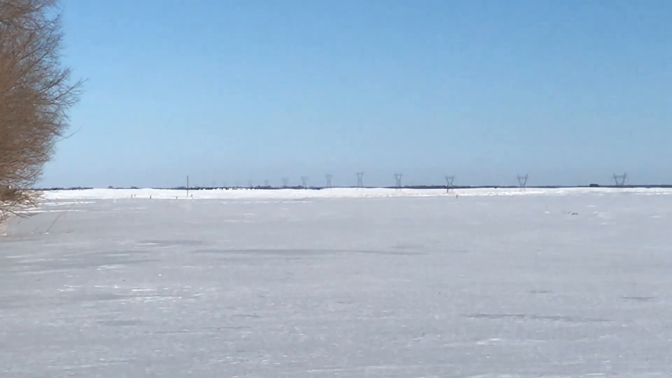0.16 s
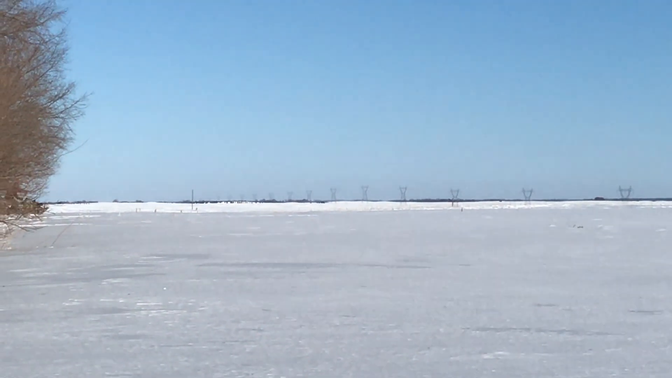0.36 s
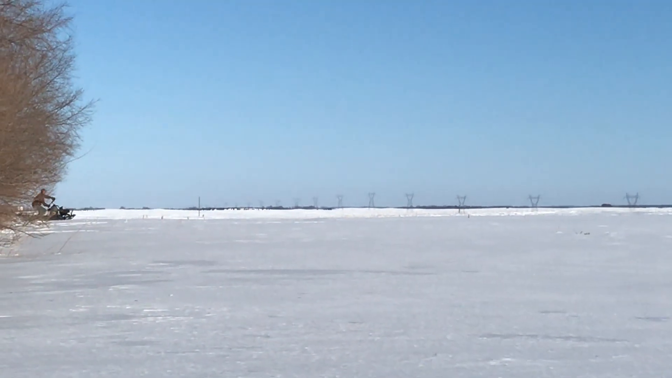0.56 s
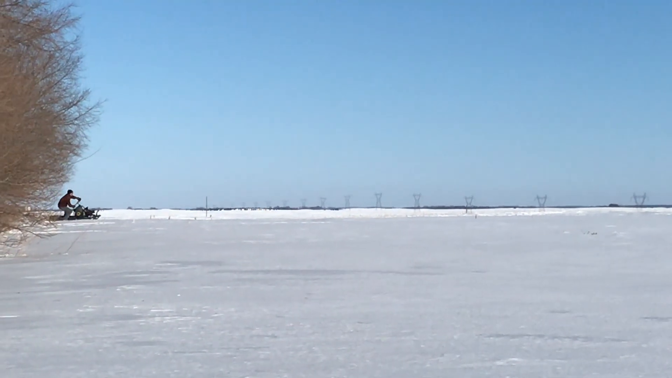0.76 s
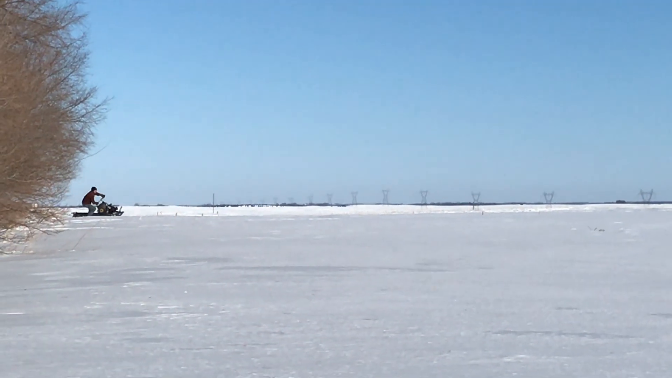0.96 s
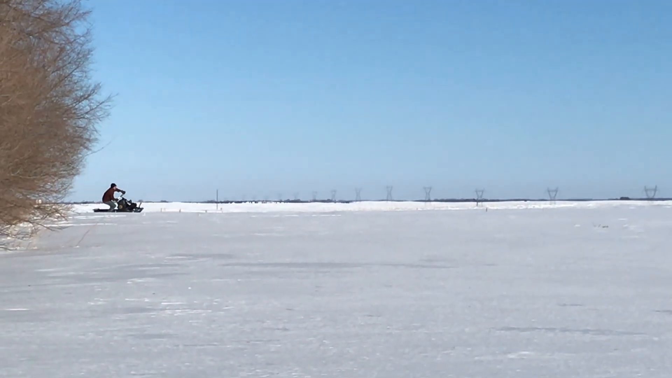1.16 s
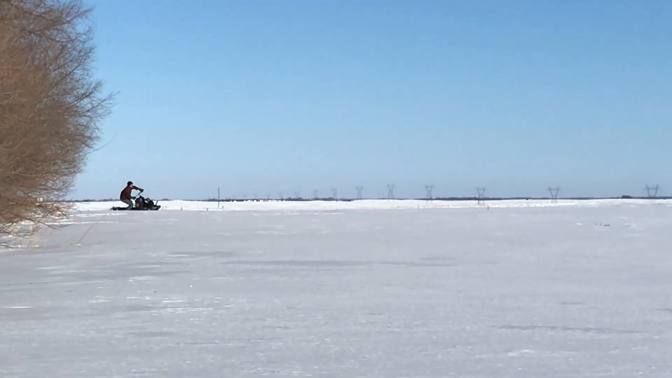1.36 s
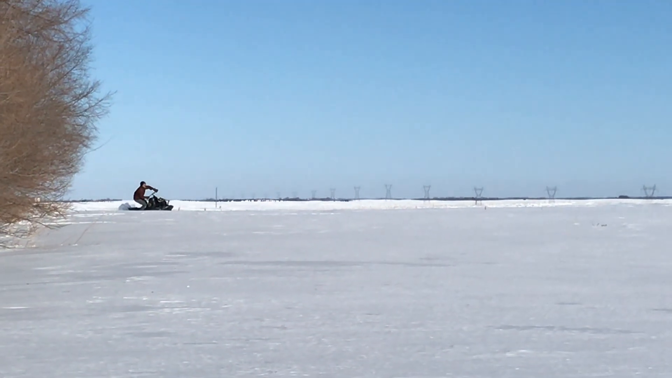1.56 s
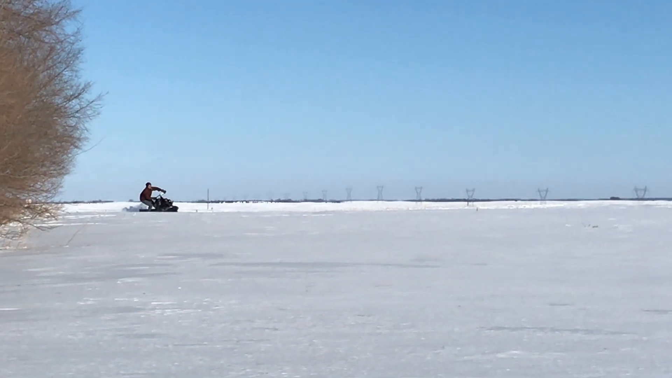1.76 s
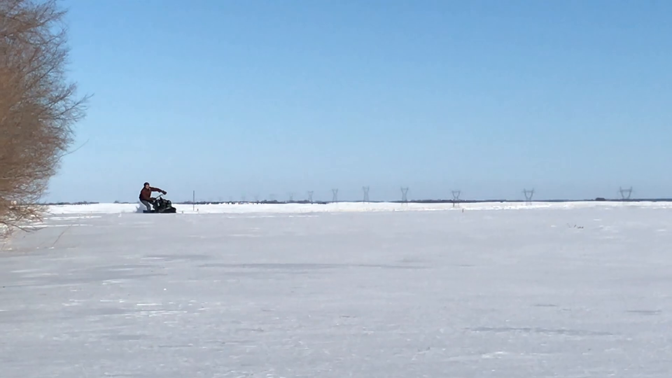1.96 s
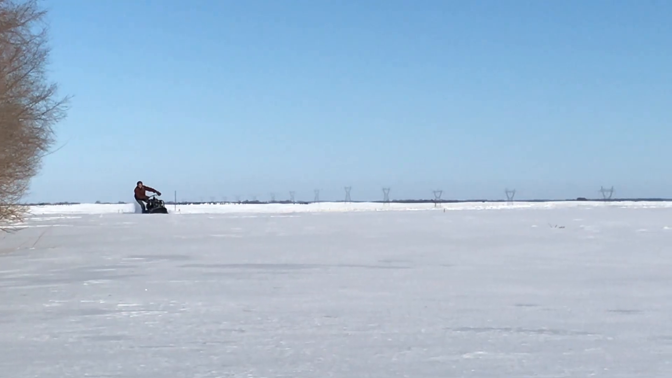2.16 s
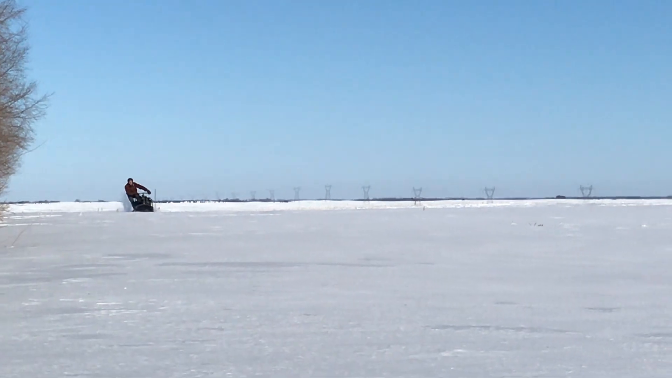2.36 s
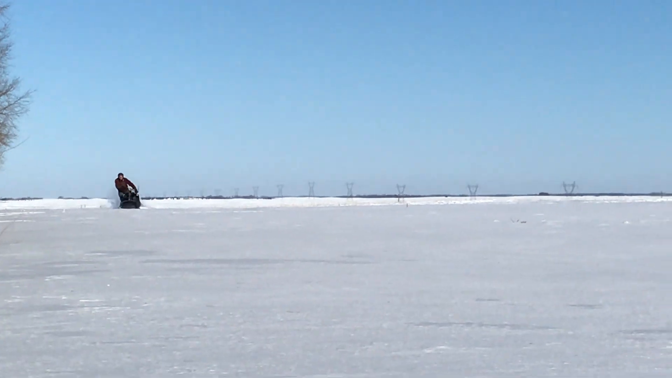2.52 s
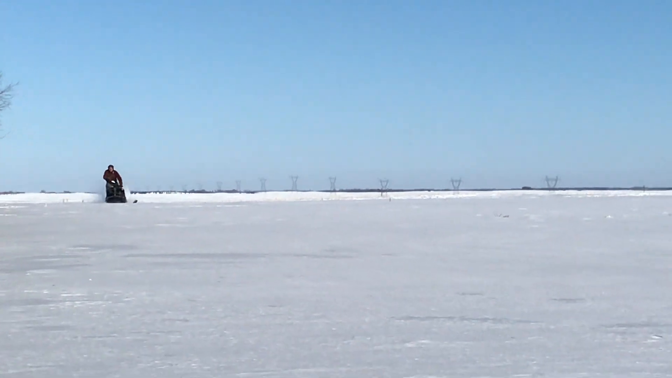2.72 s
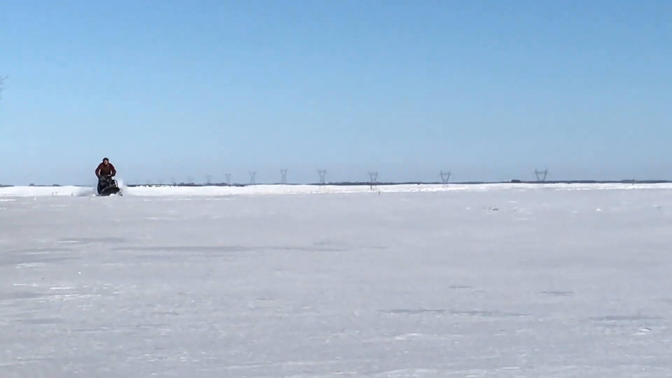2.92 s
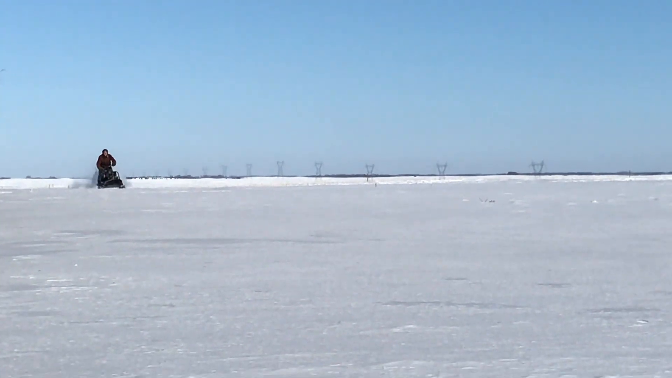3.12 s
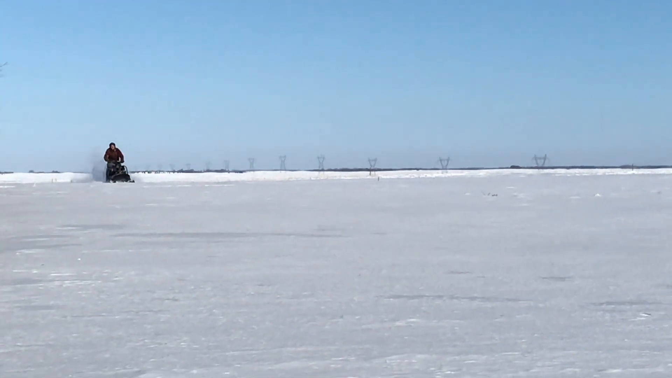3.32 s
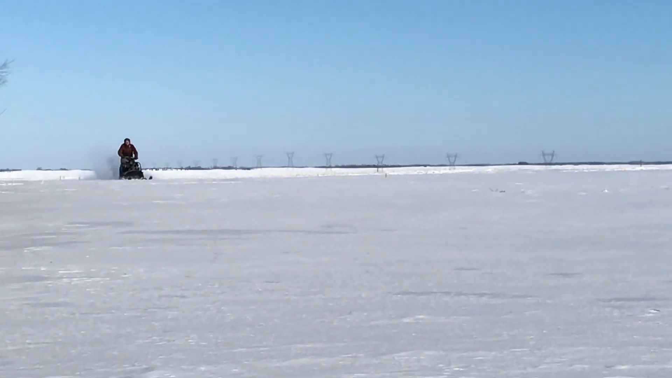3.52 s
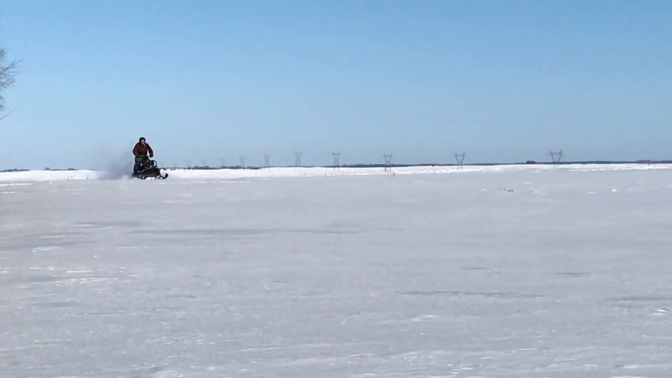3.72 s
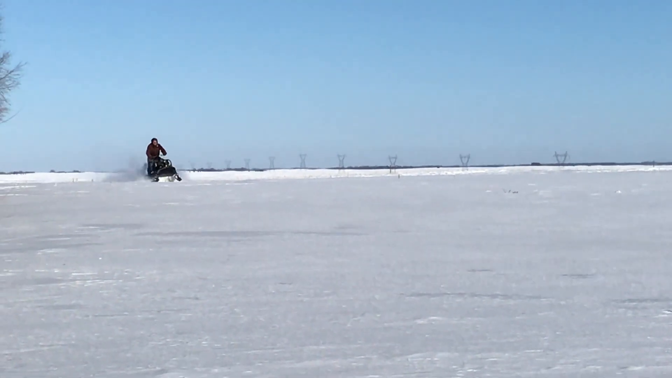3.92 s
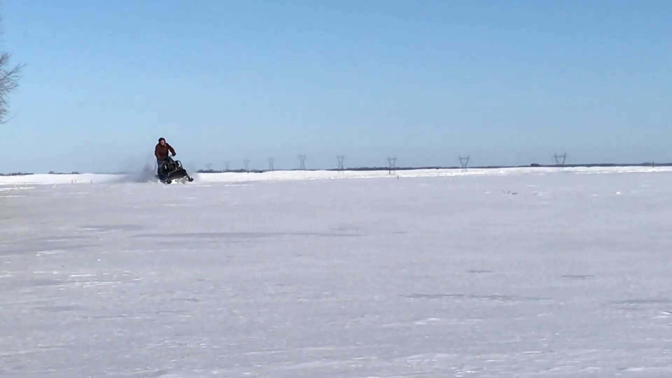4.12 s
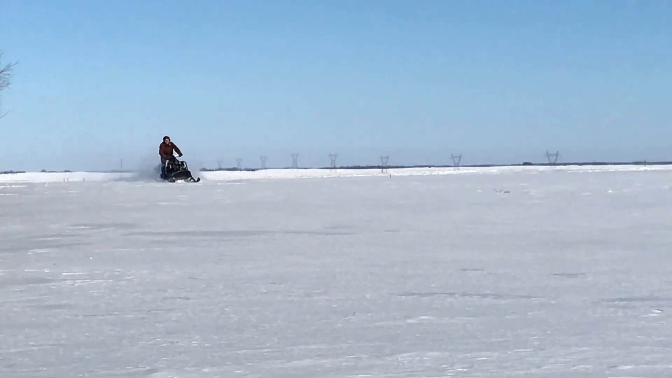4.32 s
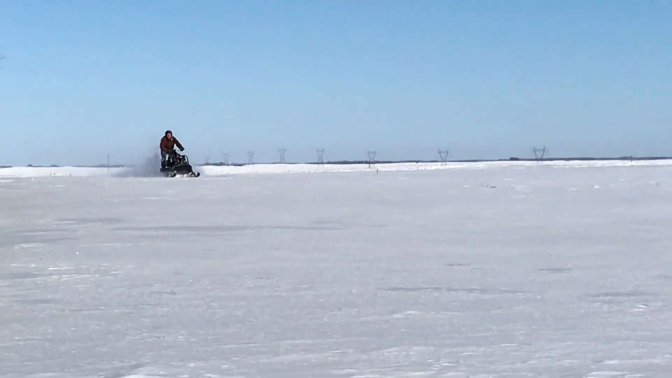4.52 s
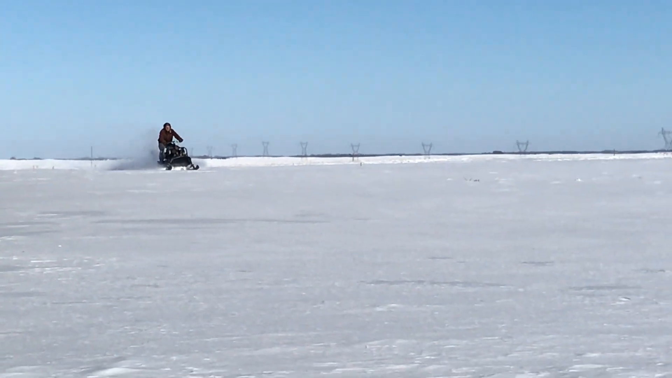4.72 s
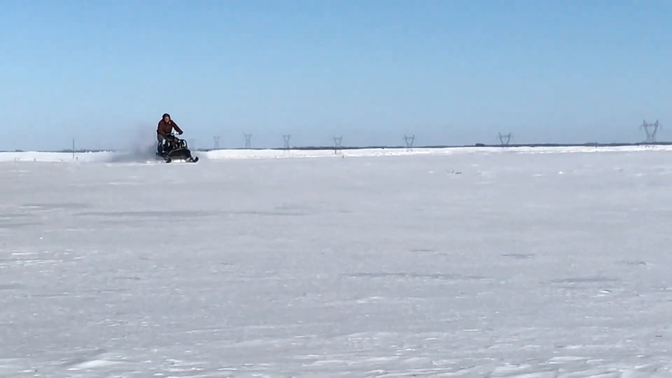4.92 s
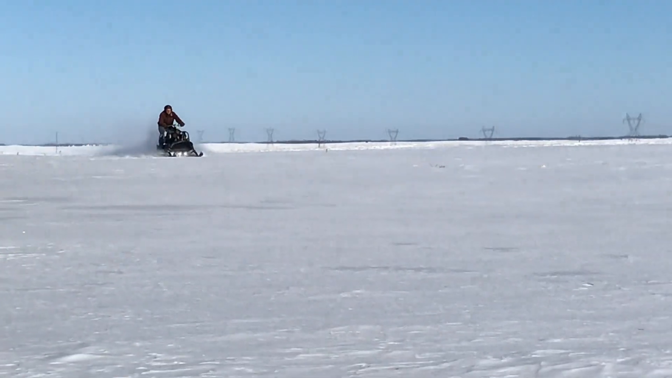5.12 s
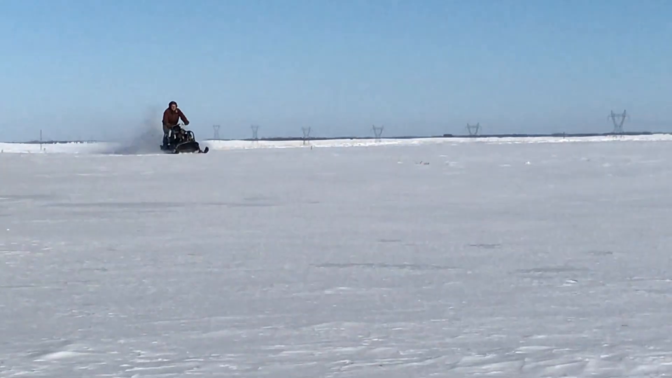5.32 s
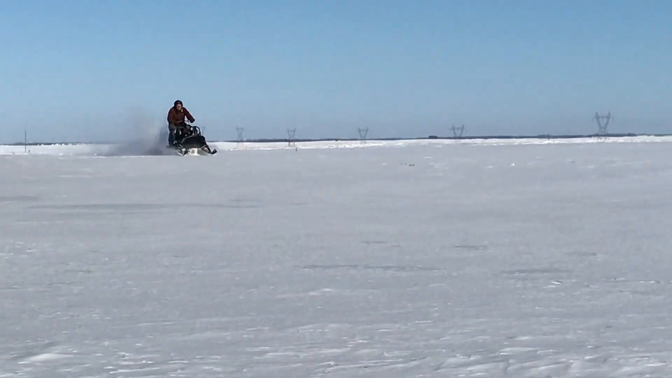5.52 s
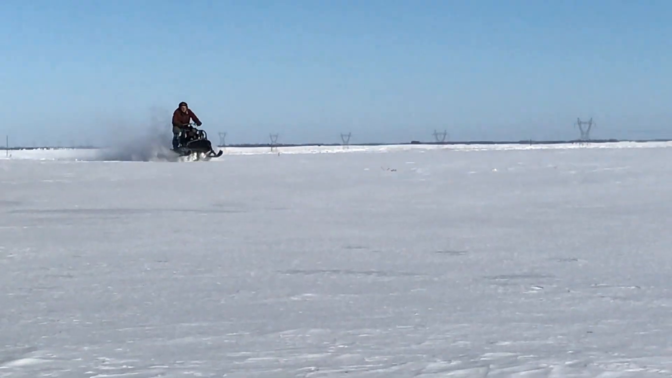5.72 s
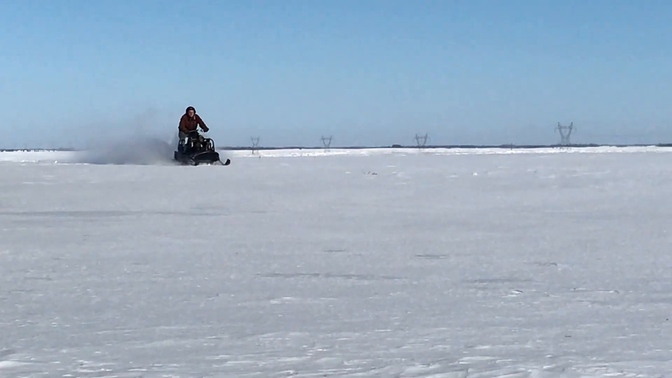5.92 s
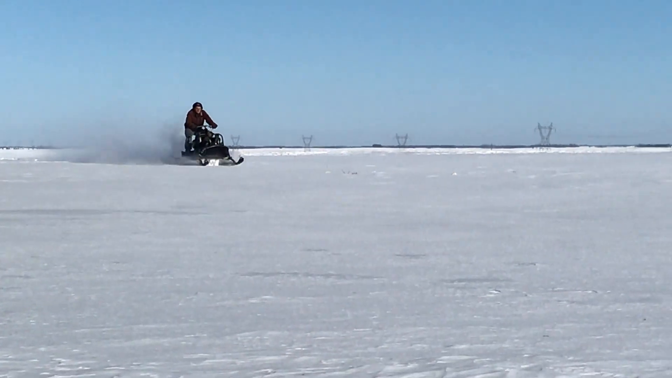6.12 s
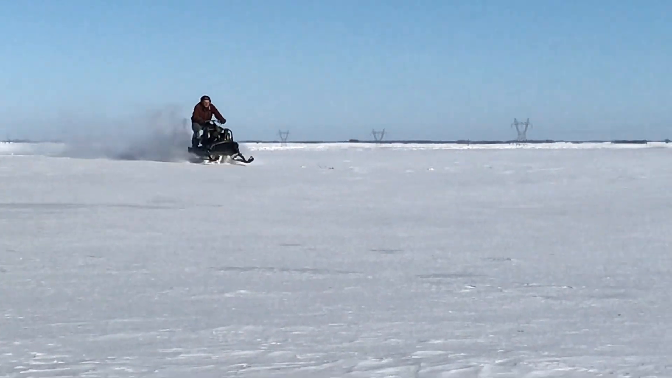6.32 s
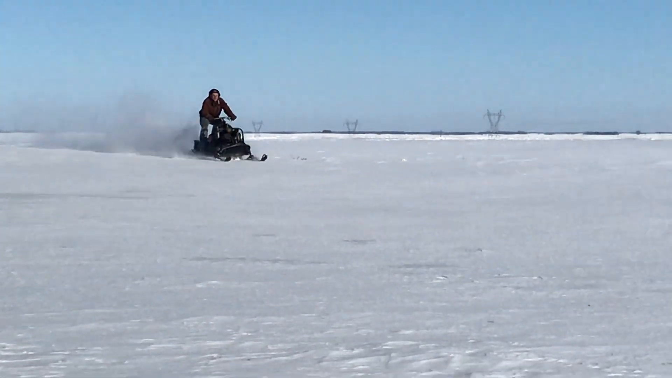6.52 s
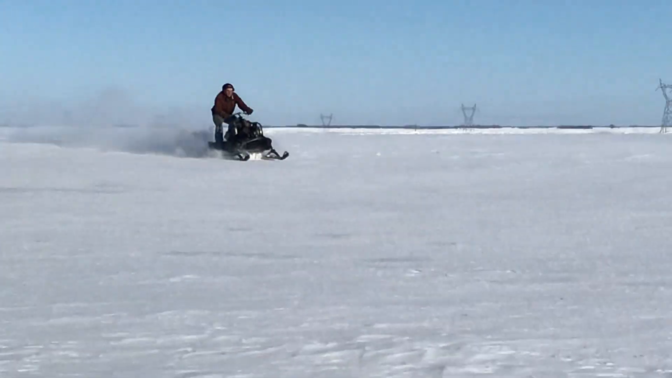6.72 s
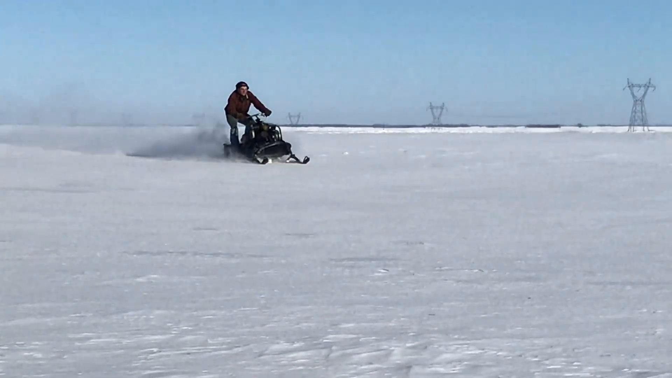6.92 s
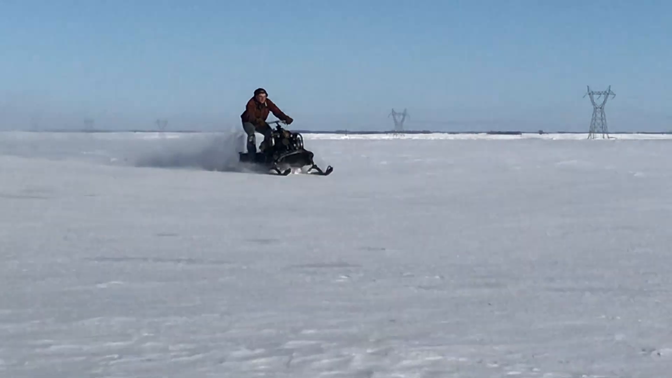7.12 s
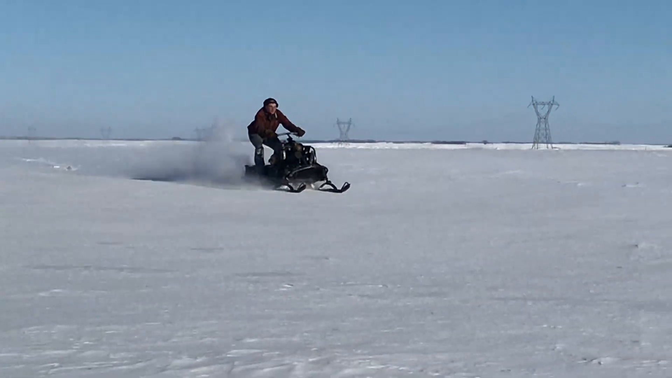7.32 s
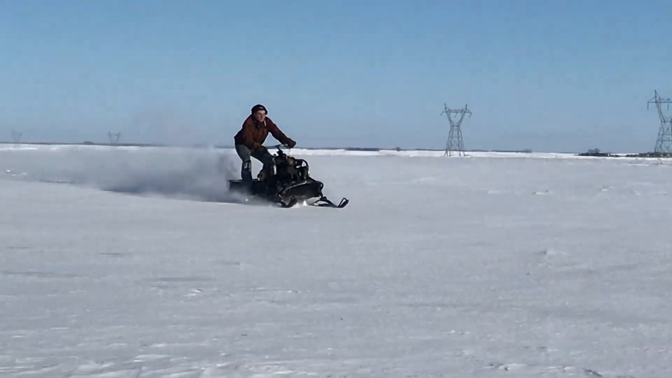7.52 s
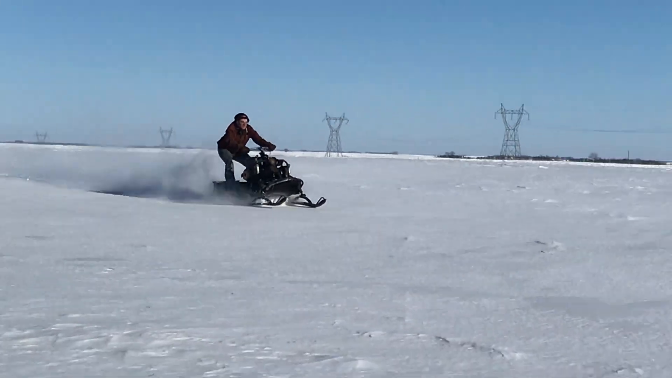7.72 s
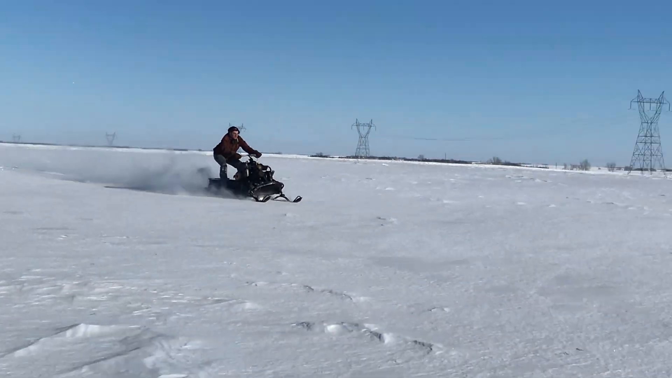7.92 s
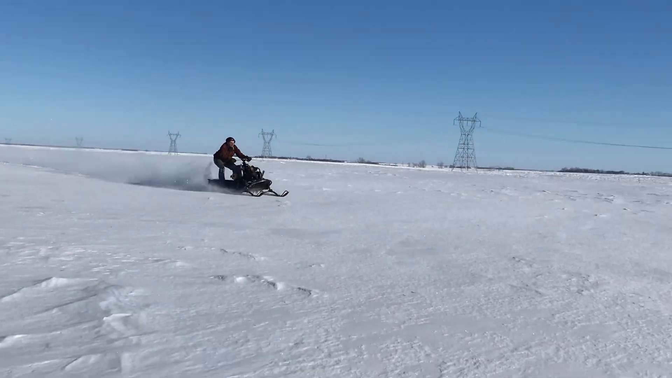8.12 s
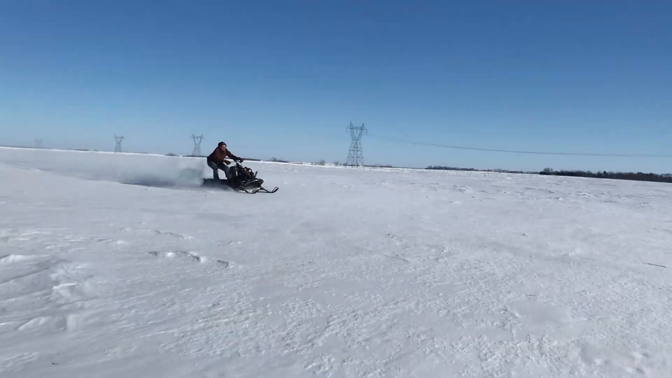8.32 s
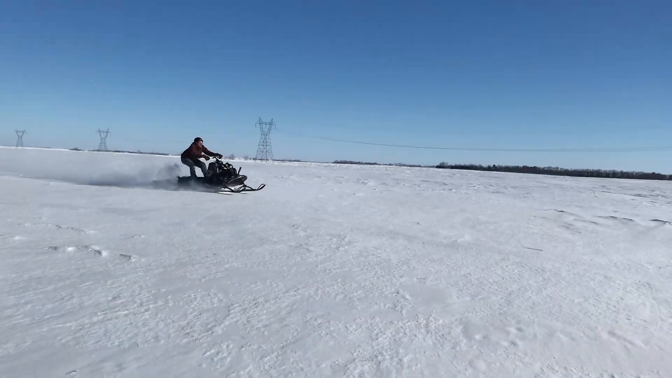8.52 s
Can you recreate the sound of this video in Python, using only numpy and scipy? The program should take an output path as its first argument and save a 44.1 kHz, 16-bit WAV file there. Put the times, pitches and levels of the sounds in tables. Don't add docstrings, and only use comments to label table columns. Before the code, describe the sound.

A distant two-stroke snowmobile putters unevenly, revs into a buzzing whine, then races closer across open snow, growing loud, raspy and rough.

```python
import sys
import numpy as np
from scipy import signal
from scipy.fft import rfft, irfft
from scipy.io import wavfile
from scipy.ndimage import uniform_filter1d

SR = 44100
rng = np.random.default_rng(int(sys.argv[2]) if len(sys.argv) > 2 else 0)


def wav_out(sig):
    wavfile.write(sys.argv[1], SR, np.round(np.clip(np.atleast_2d(sig).T, -1, 1) * 32767).astype(np.int16))


def boost_factor(decibels):
    exponent = np.asarray(decibels, float) / 20
    return 10 ** exponent


N = 381906


def evened(x):
    return x / np.sqrt(np.mean(x ** 2) + 1e-20)


def columns(rows, t):
    s, *values = np.transpose(rows)
    return [np.interp(t, s, v) for v in values]


def read(points, hz):
    f, value = np.transpose(points)
    return np.interp(np.log(hz + 1), np.log(f + 1), value)


def drift(shape, *sizes):
    x = rng.standard_normal(shape)
    for axis, size in enumerate(sizes):
        x = uniform_filter1d(uniform_filter1d(x, size, axis), size, axis)
    return evened(x)


def swells(rows, t):
    return sum(height * np.exp(-((t - s) / half) ** 2) for s, height, half in rows)


def blend(values, a, b):
    return values[0] + a * (values[1] - values[0] + b * (values[2] - values[1]))


def ring(x, hz, width):
    return signal.lfilter(*signal.iirpeak(hz, hz / width, SR), x)


def lowpass(x, hz):
    return signal.sosfiltfilt(signal.butter(2, hz, fs=SR, output="sos"), x)


def add(mix, s, sound):
    part = mix[round(s * SR):][:len(sound)]
    part += sound[:len(part)]


def puff_shape(t, rise_s, fall_s):
    return (1 - np.exp(-t / rise_s)) * np.exp(-t / fall_s)


# start_s, peak_db, ring_hz, hiss_db, thud_db
IDLE_POPS = [(0.001, -39, 3080, -72, -58), (0.019, -37, 3600, -68, -57), (0.057, -34.5, 3640, -65, -57),
             (.0987, -39, 3680, -63, -58), (0.138, -35.5, 3120, -55, -56), (.191, -32, 3000, -61, -55),
             (0.24, -34, 3120, -65, -56), (.2767, -31, 3200, -57, -55), (.319, -33.5, 2970, -61, -57),
             (0.356, -37, 3000, -58, -61), (.399, -38, 2980, -61, -59), (0.456, -36, 3070, -62, -57),
             (0.492, -43, 3620, -60, -54), (0.529, -39, 3530, -57, -59), (0.5703, -37, 3100, -60, -58),
             (.622, -43, 3530, -65, -56), (0.765, -38, 2970, -65, -59), (0.799, -44, 2990, -68, -53),
             (0.8804, -41.5, 3400, -64, -63), (.916, -48, 3400, -66, -58), (0.951, -39.5, 2960, -62, -55),
             (1.0, -38.5, 3450, -62, -54), (1.036, -35.5, 3370, -56, -50), (1.095, -35, 3450, -57, -54),
             (1.139, -35.5, 2920, -59, -54), (1.1842, -37.5, 2850, -62, -55), (1.23, -38, 3000, -59, -55),
             (1.275, -41, 3420, -60, -55), (1.322, -41, 3260, -58, -56), (1.363, -40, 3045, -57, -56),
             (1.397, -37, 3320, -59, -55), (1.438, -38.5, 3000, -59, -58)]


def pops():
    out, t = np.zeros(N), np.arange(4000) / SR
    thud = np.sin(2 * np.pi * 70 * t) + 0.52 * np.sin(2 * np.pi * 110 * t)
    thud = thud * t / 0.015 * np.exp(1 - t / 0.016)
    late = np.maximum(t - 0.011, 0)
    for s, db, hz, hiss_db, thud_db in IDLE_POPS:
        gas = rng.standard_normal((2, len(t)))
        twin = 0.41 * rng.uniform(0.32, 1.1)
        puff = gas[0] * (puff_shape(t, .002, .011) + .7 * twin * puff_shape(late, .002, .011))
        spit = gas[1] * (puff_shape(t, .001, .007) + twin * puff_shape(late, .001, .007))
        low_mode = boost_factor(swells([(0.92, 3.2, .35)], s)) * 1.4 * evened(ring(puff, 1600, 260))
        high_ring = boost_factor(swells([(.28, 4.8, 0.22)], s)) * evened(ring(ring(puff, hz, 410), hz, 410))
        mid_mode = 0.76 * evened(ring(puff, 2230, 330))
        sharp_db = swells([(.66, 5.4, .12), (1.2, 4, 0.18)], s) - 2
        sharp_mode = boost_factor(sharp_db) * evened(ring(ring(puff, 1360, 60), 1360, 60))
        body = low_mode + high_ring + mid_mode + sharp_mode
        hiss = ring(ring(spit, 9300, 3000), 9300, 3000)
        hiss = hiss + 1.3 * ring(ring(spit, 6000, 2400), 5200, 2400) + .45 * ring(spit, 13000, 5000)
        add(out, s, boost_factor(db - 29.0) * body + boost_factor(hiss_db - 11) * evened(hiss) + boost_factor(thud_db) * thud)
    return out


# start_s, firing_rate_hz
SPEED = [(0, 100.6), (.5, 102.1), (.89, 112.5), (1.08, 92.9), (1.32, 95.96), (1.72, 142.68), (1.95, 160.46),
         (2.23, 163.94), (2.91, 151.39), (2.98, 153.71), (3.71, 140.37), (4.04, 155.46), (4.39, 166.28),
         (5.97, 166.42), (6.75, 165.6), (7.47, 171.05), (8.37, 175.71), (8.66, 172.64)]
# centre_s, surge_hz, half_length_s
SLIPS = [
    (5.069, 3.36, .176),
    (5.475, 7.58, .138),
    (5.926, 10.22, .182),
    (6.516, 5.02, .128),
]
# centre_s, speed_swing_hz,
# half_length_s
BOUNCES = [(1.585, -2.2, .06), (2.55, -1.1, .14), (2.95, -.9, .14), (3.25, 1.3, .07), (3.56, 1, .08),
           (3.76, 1.5, .09), (4.15, 1.6, .1), (4.6, 1.4, .07), (5.0, 1.2, .14), (5.35, -1, .07),
           (5.6, -1, .07), (6.33, -1, .06), (7.14, 1.05, .1), (7.72, 1.2, .09), (8.07, .7, .1),
           (8.53, 1, .1)]


def bounces(t):
    out = 0
    for s, hz, half in BOUNCES:
        x = (t - s) / half
        out = out - np.sqrt(2 * np.e) * hz * x * np.exp(-x ** 2)
    return out


def engine_turns(t):
    coarse = t[::100]
    hz = columns(SPEED, t)[0] + np.interp(t, coarse, swells(SLIPS, coarse) + bounces(coarse))
    return np.cumsum(hz) / SR + 3.09


QUARTERS = [(.25, -8, -7), (.5, -11, -1.5), (.75, 4.5, -2.5), (1.25, -4.5, -10.5), (1.5, -28, -12.5),
            (1.75, -12, -23)]


def tones(turns, revs, first_db, second_db, third_db, quarter_db):
    orders = [(1, first_db), (2, second_db), (3, third_db - 0.5)]
    orders += [(k, quarter_db + idle + revs * (db - idle)) for k, idle, db in QUARTERS]
    waver = np.repeat(drift((len(orders), N // 100 + 1), 1, 26), 100, axis=1)[:, :N]
    waver = uniform_filter1d(waver, size=100, axis=1)
    lags = rng.random(len(orders)) * .7
    out = np.zeros(N)
    for (k, db), w, lag in zip(orders, waver, lags):
        level = np.sqrt(2) * boost_factor(db + 0.82 * k ** 0.66 * w)
        out += level * np.cos(2 * np.pi * (k * turns - lag))
    return out


def firings(turns, strength, scatter_s):
    at = np.interp(np.arange(np.ceil(turns[0]), turns[-1]), turns, np.arange(N))
    size = strength[at.astype(int) + 1]
    at = at + scatter_s * SR * rng.standard_normal(len(at))
    near = np.clip(at.astype(int)[:, None] + np.arange(-8, 9), 0, N - 1)
    out = np.zeros(N)
    np.add.at(out, near, np.sinc(near - at[:, None]) * np.hanning(19)[1:-1] * size[:, None])
    return out


PATTERN_DB = [-2, 0, -4, -12.5]
CRACK = (.45, .8, .4, .3)
# centre_hz, width_hz, side_on_db, head_on_db
PIPE = [(845, 350, 8.5, -9), (997, 11, 14, -15.5), (1290, 44.6, -49, -29), (1359, 43, -8, -1),
        (1783, 99, -5, -2.5), (2164, 190, -7, -13), (2590, 64, -4, -46), (2770, 54, -4, -7),
        (3530, 190, -32, 1), (4255, 166, 16, 7), (4554, 41, 19, 8), (5150, 580, -32, 8),
        (6920, 180, -11, 1)]


def exhaust(turns, missed, noisy, facing):
    count = turns.astype(int)
    uneven_db = 0.14 * rng.standard_normal(count[-1] + 1)[count]
    strength = boost_factor(missed * np.take(PATTERN_DB, count % 4) + uneven_db)
    clicks = firings(turns, np.append(strength, 0), .000028)

    t = np.arange(1500) / SR
    echoes = rng.standard_normal((6, len(t))) * np.exp(-t / .007)
    echoes = irfft(np.exp(1j * np.angle(rfft(echoes))), len(t))
    heading = drift((6, N // 441 + 2), 1, 14)
    heading = np.repeat(heading, 441, axis=1)[:, :N]
    heading = heading + (.2 + 1.5 * facing) * (np.arange(6) == 0)[:, None]
    heading = heading + 1.64 * missed * rng.standard_normal((6, 4))[:, count % 4]
    heading = heading / np.linalg.norm(heading, axis=0)
    clatter = sum(signal.oaconvolve(clicks * h, e)[:N] for h, e in zip(heading, echoes))
    clatter = clatter - np.take(CRACK, (turns + .5).astype(int) % 4) * missed ** 2 * clicks

    puffs = signal.lfilter([1], [1, -np.exp(-1 / (.0105 * SR))], abs(clicks)) * rng.standard_normal(N)
    clean, rough = (1 - noisy) * evened(clatter), noisy * evened(puffs)
    drive = .6 * clean + .7 * rough
    rings = np.zeros(N)
    for hz, width, side_db, head_db in PIPE:
        rings += boost_factor(side_db + facing * (head_db - side_db)) * ring(drive, hz, width)

    direct = _shielded(clean, missed)
    rough = rough - .4 * facing * ring(rough, 865, 150)
    return direct + rough + boost_factor(6.6) * rings


def _shielded(clean, missed):
    return clean - (.6 - .35 * missed) * lowpass(clean, 2800) - .3 * lowpass(clean, 1200)


# centre_hz, db_per_hz
COLOUR_IDLE = [(210, -47), (350, -18), (555, -32), (787, -21), (1190, 0), (1350, 7), (2040, 1), (2240, 0),
               (3560, -25), (5550, -38), (15600, -45)]
COLOUR_SIDE = [(210, -46), (350, -43), (682, -1), (787, 4), (1210, 9.5), (1350, 13), (1610, 17.5),
               (2170, 7), (2990, -12), (4300, -40), (15600, -55)]
COLOUR_HEAD = [(210, -43), (350, -54), (458, -29), (512, -16.5), (880, -9), (1010, -6.5), (1120, -7.5),
               (1350, 3), (1510, -2), (2170, -1.5), (2990, -9.5), (4300, -4), (6200, -10), (7150, -8),
               (15600, -17.5)]
# start_s, angle_deg between the exhaust jet and the listener
JET = [(0, 83), (1.3, 80), (1.6, 90), (2.3, 92), (4.0, 57), (5.7, 31), (7.1, 27), (7.9, 80), (8.3, 57),
       (8.66, 44)]
# centre_s, level_db, half_length_s
GUSTS = [(4.35, 0.5, 0.055), (4.9, 4.5, 0.12), (5.15, -4, 0.071), (5.9, 3.5, 0.064), (6.4, -7, 0.16),
         (7.43, -3.5, 0.04), (7.78, -3, 0.054), (8.1, 4.5, 0.11)]
# centre_hz, half_width_hz, centre_s, half_length_s,
# level_db
TINTS = [(5270, 1100, 9.24, 0.52, -12), (2900, 300, 8.56, 0.15, 7.5), (3000, 540, 7.69, 0.28, -5.5),
         (5130, 330, 7.2, 0.62, 1), (4330, 430, 6.5, 0.47, -1.5), (3600, 430, 6.6, 0.76, -5.5),
         (2260, 280, 7.26, 0.22, 1), (4300, 550, 8.55, 0.51, 5.5), (4360, 440, 4.5, 0.77, -2),
         (3220, 410, 2.74, .6, -4), (6200, 1400, 8.62, 0.12, -3), (13500, 3300, 12, .15, -6.5),
         (12300, 1200, 8, 0.15, -7), (3660, 200, 8.58, 0.5, 7.5), (1980, 480, 1.22, 0.36, -16),
         (4000, 980, 3.4, 0.12, 3), (900, 59, 7.7, 0.43, -3), (450, 120, .7, .6, -4),
         (14000, 2800, 7.87, 0.055, 8), (13000, 1800, 7.65, .15, -3.5), (14500, 2000, 7.3, 0.17, -6),
         (5440, 2500, 5.8, 0.064, 2.5), (9000, 6500, 5.9, .04, 1), (5000, 2800, 6.08, 0.093, -2.5),
         (1370, 60, 6.97, 0.057, -5), (1370, 60, 7.9, .04, -5), (870, 83, 8.2, .35, -1.5),
         (800, 300, 1.65, 0.12, -2), (480, 80, 3.8, .35, -4), (4600, 700, 7.35, 0.13, 1),
         (1330, 90, .7, .1, 6), (4270, 150, 2.4, 1, -5)]
# rasp_db, hiss_db
CHOP_DB = (2, 3.5)


def over_snow(x, throb, facing, revs, bark_db, bite_db):
    hz, t, z = signal.stft(x, SR, nperseg=256, noverlap=192)
    at = np.arange(N) / SR
    throb, facing, revs, bark_db, bite_db = [np.interp(t, at, v) for v in (throb, facing, revs, bark_db, bite_db)]
    smooth_db = 10 * np.log10(uniform_filter1d((abs(z) ** 2).mean(1), size=5))
    idle_db, side_db, head_db = [read(c, hz)[:, None] for c in (COLOUR_IDLE, COLOUR_SIDE, COLOUR_HEAD)]
    z = z * boost_factor(blend((idle_db, side_db, head_db), revs, 0) * (1 - facing) + facing * head_db
                - smooth_db[:, None])

    slow = uniform_filter1d(abs(z) ** 2, size=120, axis=1)
    rasp_db = bite_db + 0.3542 * swells(SLIPS, t)
    hiss_db = rasp_db - 0.1426 * columns(JET, t)[0] + swells(GUSTS, t)
    rasp_db, hiss_db = rasp_db + CHOP_DB[0] * throb, hiss_db + CHOP_DB[1] * throb
    bands_hz = [(900, 2500), (2500, 6000), (6000, 15600)]
    own_db = [10 * np.log10(slow[(hz > lo) & (hz <= hi)].sum(0) * 4 / 3) for lo, hi in bands_hz]
    gain_db = np.array([bark_db - 2 * revs, bark_db + rasp_db, bark_db + hiss_db]) - own_db
    place = np.interp(np.log(hz + 1), np.log([1900, 3400, 5000, 7500]), [0, 1, 1, 2])
    shares = np.clip(1 - abs(place[:, None] - np.arange(3)), 0, 1)

    patches_db = 0.83 * drift(z.shape, 4, 61)
    patches_db = patches_db + 0.52 * drift(len(t), 38) * np.clip(place, 0, 1)[:, None]
    patches_db = patches_db + 0.96 * drift(len(t), 12) * np.clip(place - 1, 0, 1)[:, None]
    for f, wide, s, half, db in TINTS:
        patches_db += db * np.exp(-((hz[:, None] - f) / wide) ** 2 - ((t - s) / half) ** 2)
    return signal.istft(z * boost_factor(shares @ gain_db + patches_db), SR, nperseg=256, noverlap=192)[1][:N]


# centre_hz, db_per_hz
RUMBLE = [(25, -40), (40, 11.5), (70, 5), (150, 5), (300, -2), (600, -1), (1200, -22)]


def rumble(first_db):
    colour = boost_factor(read(RUMBLE, np.fft.rfftfreq(N, 1 / SR)))
    noise = irfft(rfft(rng.standard_normal(N)) * colour, N)
    near_db = uniform_filter1d(first_db, size=20000)
    return evened(noise) * np.hypot(boost_factor(-63), boost_factor(near_db - 9.0))


# start_s, peak_db
THUMP = [
    (1.5035, -33),
]
# start_s, peak_db, hz (the grit rings broadly around 0.49 times this)
TICKS = [
    (2.791, -19.5, 4290),
    (3.39, -20, 4360),
    (3.6973, -23, 4295),
]


def knocks():
    out, t = np.zeros(N), np.arange(600) / SR
    for s, db in THUMP:
        add(out, s, -boost_factor(db) * np.sin(2 * np.pi * 500 * t) * np.exp(-(t / .0012) ** 2))
    for s, db, hz in TICKS:
        grit = rng.standard_normal(len(t)) * np.exp(-t / 0.0039)
        add(out, s, boost_factor(db - 25.5) * evened(ring(grit, 0.49 * hz, 5300)))
    return out


SINGING = {4: [(2.4, 0.78, -19), (3.6, 0.22, -18), (5.45, 0.19, -27), (8.4, 0.61, -22)],
           5: [(1.97, 0.18, -8), (2.87, 0.22, -14.5), (3.6, 0.4, -15)], 6: [(3.57, 0.19, -9),
           (4.62, 0.27, -12.5), (5.4, 0.56, -24), (6.15, 0.27, -16.5), (7.05, 0.35, -13.5),
           (7.65, 0.23, -20.5), (8.25, 0.19, -16)], 7: [(2.17, 0.44, -12), (3.9, 0.29, -14),
           (5.95, 0.055, -12), (7.3, 0.3, -15.5), (8.4, 0.44, -14)], 8: [(2.07, .25, -19),
           (3.72, 0.19, -23), (4.37, .06, -6), (4.6, 0.15, -12.5), (5.05, 0.15, -10), (5.4, 0.06, -7.5),
           (5.7, 0.15, -8), (6.1, 0.074, -6), (6.48, 0.23, -11), (7.12, 0.056, -11), (7.5, 0.36, -11),
           (7.8, 0.038, -10), (8.1, 0.2, -7.5), (8.57, .1, -14)], 8.25: [(4.4, 0.052, -13),
           (4.7, 0.041, -3), (5.0, 0.15, -9), (5.38, 0.036, -12), (6.25, .1, -8), (6.53, 0.071, -12),
           (6.8, 0.14, -6), (7.8, 0.049, -15), (8.6, 0.1, -15)], 9: [(2.05, 0.45, -16), (2.78, .06, -5),
           (3.05, 0.23, -10), (3.85, 0.19, -9), (4.75, 0.19, -13)], 10: [(4.6, 0.49, -10.5),
           (5.35, 0.22, -12), (5.9, 0.091, -10), (6.2, 0.25, -10), (7.0, 0.48, -24), (7.95, 0.17, -7)]}
SINGING_HIGH = {10.25: [(5.9, 0.14, -6), (7.98, 0.23, -10.5)], 12.25: [(5.87, 0.072, -9),
                (8.05, 0.13, -11)], 11: [(1.8, .06, -19), (2.17, 0.17, -1.5), (2.52, .12, -8),
                (3.47, 0.13, -11), (4.95, 0.47, -9.5), (6.3, 0.33, -9.5), (7.0, 0.48, -6.5),
                (8.57, 0.11, -12)], 12: [(1.88, 0.11, -3), (2.55, .1, -7), (2.95, 0.25, -5),
                (3.45, 0.081, -5), (6.72, 0.18, -18), (8.35, 0.98, -12.5)], 13: [(2.12, .08, -7),
                (2.5, .15, -15), (3.58, 0.044, -8), (6.4, 0.21, -10), (7.0, 0.44, -18)],
                14: [(1.76, 0.099, -9), (2.58, 0.16, -2.5), (2.85, 0.076, -6.5), (3.12, 0.091, -11),
                (4.2, 0.12, -24), (8.0, 0.36, -11.5)], 15: [(1.7, 0.048, -8), (2.6, .08, -4),
                (3.4, 0.19, -1), (4.2, .1, -17)], 16: [(1.93, 0.04, 0), (2.33, .09, -1), (8.5, 0.15, -11)],
                17: [(1.7, 0.056, -2.5), (3.95, 0.17, -11)], 18: [(1.61, 0.064, -13), (2.9, 0.13, -31),
                (3.85, 0.1, -21), (4.12, .1, -18)], 19: [(3.35, 0.063, -4), (3.8, .13, -9)],
                20: [(1.77, .05, -11), (8.1, 0.49, -14)], 23: [(1.63, .06, -10), (1.97, 0.047, -10)],
                24: [(8.3, 0.23, -3.5)], 26: [(1.94, .07, -9), (2.2, 0.088, -7)], 29: [(1.7, 0.045, -8)],
                31: [(1.74, .07, -15)]}


def singing(turns, missed, bark_db):
    t, coarse = np.arange(N) / SR, np.arange(0, N + 100, 100) / SR
    orders = SINGING | SINGING_HIGH
    throb = boost_factor(0.32 * missed * np.take(PATTERN_DB, turns.astype(int) % 4))
    throb = uniform_filter1d(throb, size=150)
    waver = drift((len(orders), len(coarse), 2), 1, 12)
    out = np.zeros(N)
    for (k, rows), w in zip(orders.items(), waver):
        size = sum(boost_factor(db) * np.exp(-((coarse - s) / half) ** 4) for s, half, db in rows)
        size = np.interp(t, coarse, size * boost_factor(2.2 * w[:, 0]))
        out -= size * np.cos(2 * np.pi * k * (turns - 1.02) + np.interp(t, coarse, 0.49 * w[:, 1]))
    return np.sqrt(2) * boost_factor(bark_db) * out * throb / uniform_filter1d(throb, size=2100)


# start_s, missed_share 0-1, noise_share 0-1 of each pop
MISFIRE = [
    (0, .5, .7),
    (1.35, .5, .7),
    (1.55, .05, .33),
    (4.26, .05, .35),
    (4.31, .45, .42),
    (5.6, .5, .42),
    (6.2, .9, .38),
    (8.66, .9, .38),
]
# start_s, facing 0 side-on to 1 head-on
FACING = [
    (0, 0.53),
    (3.7, 0.64),
    (4.5, 0.82),
    (8.66, 0.95),
]
# start_s, revs 0 idle to 1 under power
REVS = [
    (0, 0),
    (1.35, 0),
    (1.6, 1),
    (8.66, 1),
]
# start_s, firing_tone_db, pipe_bark_db, throttle_bite_db
EFFORT = [(0, -57, -44, -10), (.55, -61.5, -43, -7), (.89, -64, -51, -21), (1.3, -55.5, -45, -7),
          (1.62, -51, -48, 1), (1.9, -53, -47.5, 4.5), (2.7, -53, -48, 3.5), (3.66, -49, -48.5, 3.5),
          (4.07, -45.5, -42, 4.5), (4.36, -47.5, -38, -0.5), (5.5, -45, -34.5, -3),
          (5.75, -44.5, -29.5, -2), (6.08, -43.5, -31.5, 2.5), (6.4, -43.5, -28.5, 6),
          (7.19, -39.5, -27, 5.5), (7.85, -35, -24, 6), (8.5, -30, -21.5, 1.5), (8.66, -29.5, -20.5, 0.5)]
# centre_s, level_db, half_length_s
GROUND = [
    (.15, 1.5, 0.18),
    (2.4, 10, 0.52),
    (3.28, -7, 0.061),
    (4.48, -10.5, 0.21),
    (6.5, -2, 0.15),
    (7.9, 1, 0.83),
]
# idle_db, side_on_db, head_on_db
SECOND_DB = (-9, -11, -8)
THIRD_DB = (-12.5, -17, -18)
# idle_db, all_firing_db, missing_db
QUARTER_DB = (-0.5, -12.5, -3)


def scene():
    t = np.arange(N) / SR
    turns = engine_turns(t)
    first_db, bark_db, bite_db = columns(EFFORT, t)
    missed, noisy = columns(MISFIRE, t)
    revs = columns(REVS, t)[0]
    facing = np.clip(columns(FACING, t)[0], 0, 1)
    turned = np.clip(2 * facing - 1, 0, 1)
    second_db = first_db + blend(SECOND_DB, revs, turned) + swells(GROUND, t)
    third_db = first_db + blend(THIRD_DB, revs, turned)
    quarter_db = first_db + blend(QUARTER_DB, revs, np.clip(2.5 * missed - .125, 0, 1))
    throb = revs * missed * (1 - turns % 4 / 2)
    bark = over_snow(exhaust(turns, missed, noisy, facing), throb, facing, revs, bark_db, bite_db)
    bark = boost_factor(-8 * (1 - revs)) * bark
    engine = tones(turns, revs, first_db, second_db, third_db, quarter_db) + bark
    engine = engine + singing(turns, missed, bark_db)
    return (pops() + engine + rumble(first_db) + knocks())[None]


def roll_off(x):
    return signal.sosfilt(signal.butter(12, 15720, fs=SR, output="sos"), x)


def record(dry):
    cut = signal.sosfilt(signal.butter(4, 38, "high", fs=SR, output="sos"), dry)
    cut = cut - 0.57 * ring(cut, 10440, 820)
    cut = 1.1 * np.tanh(cut / 1.1)
    return roll_off(cut)


dry = scene()
out = record(dry)
wav_out(out)
```